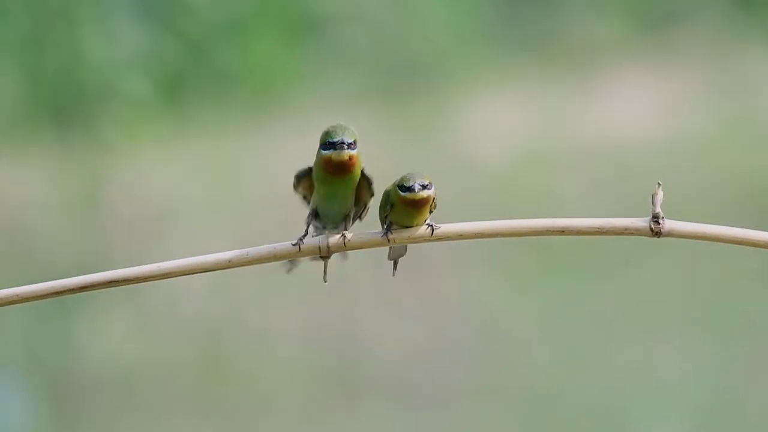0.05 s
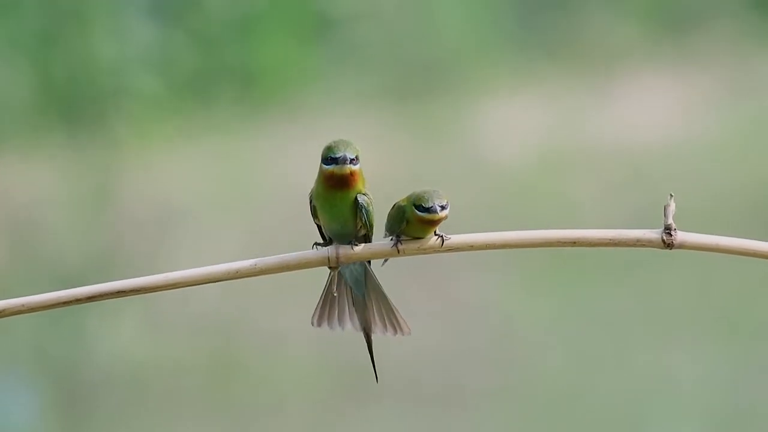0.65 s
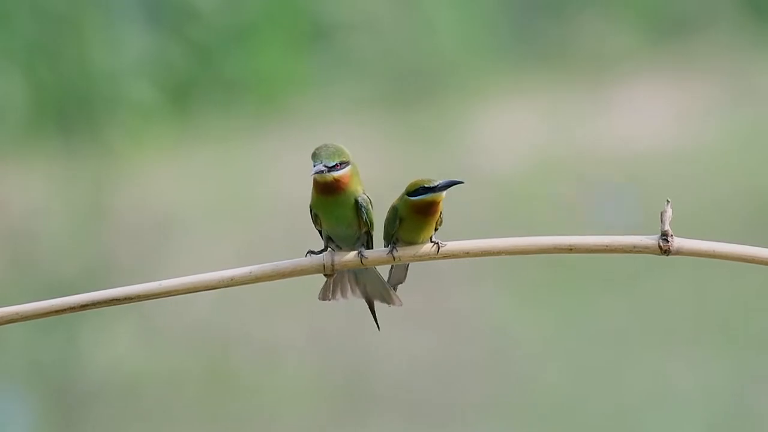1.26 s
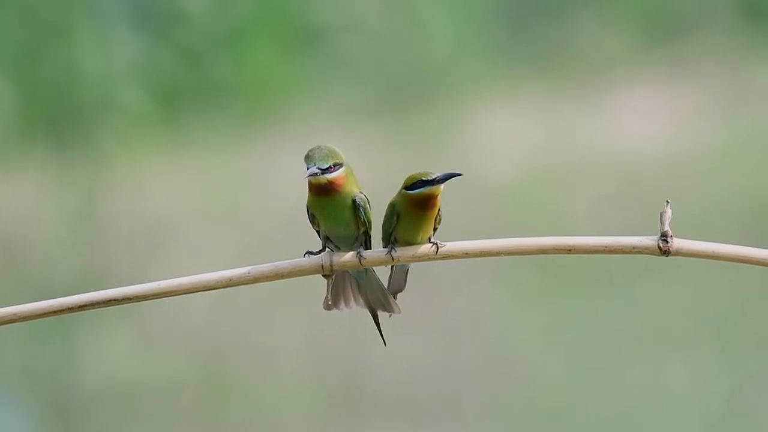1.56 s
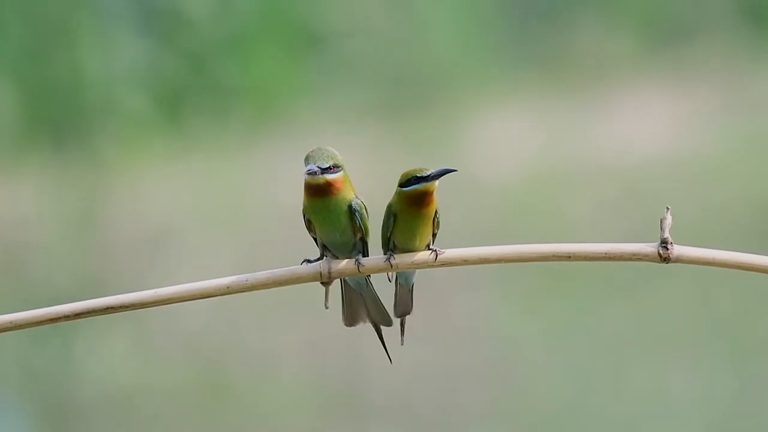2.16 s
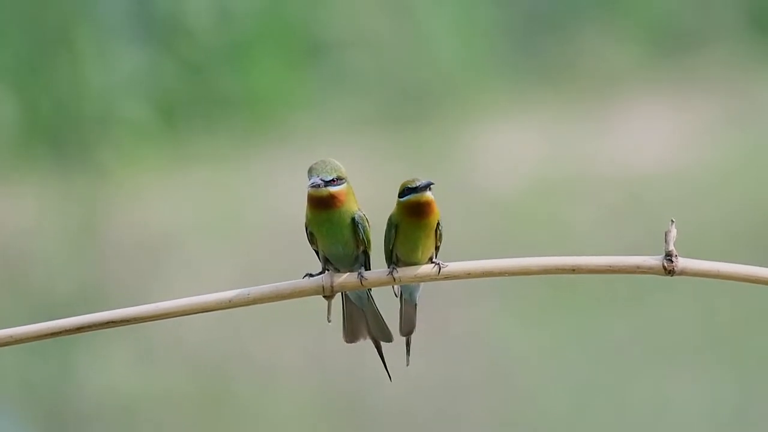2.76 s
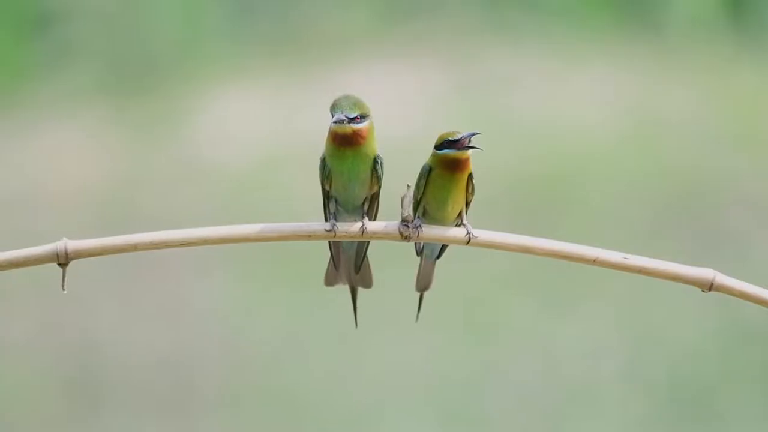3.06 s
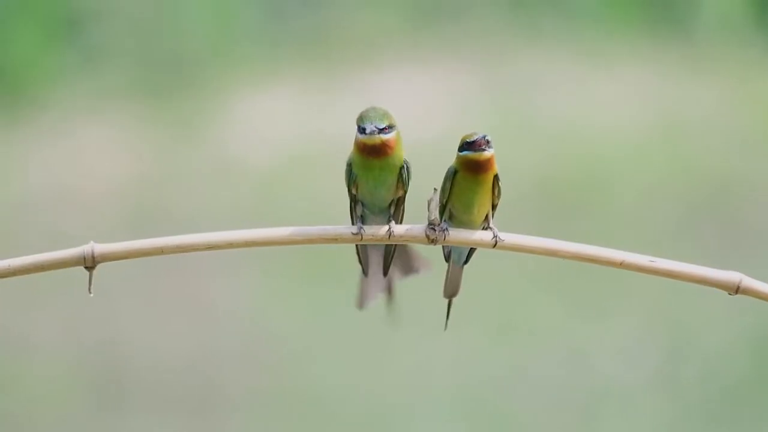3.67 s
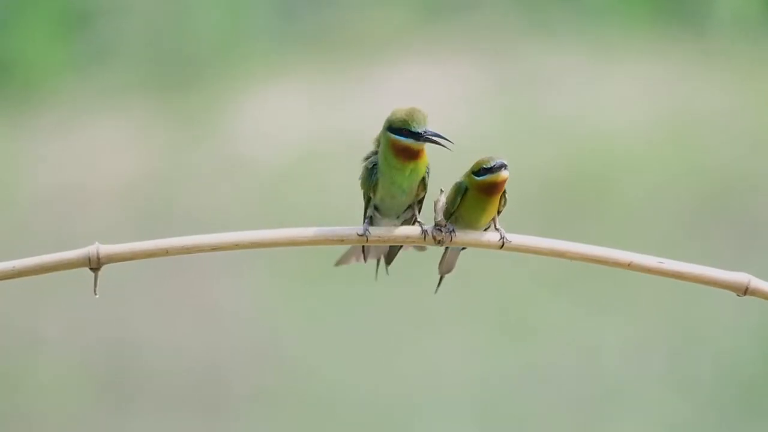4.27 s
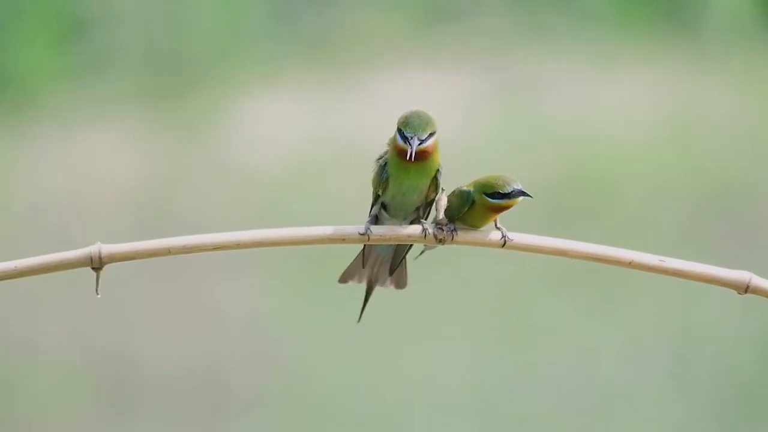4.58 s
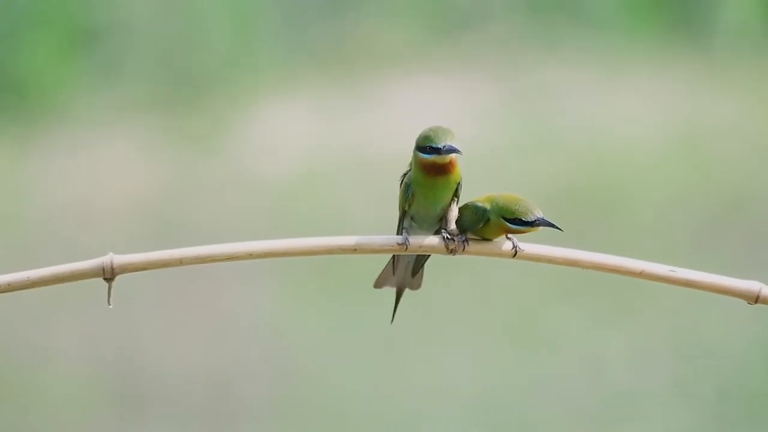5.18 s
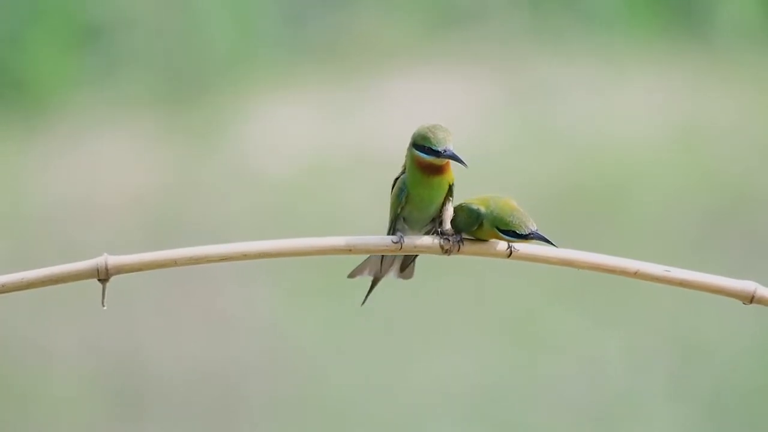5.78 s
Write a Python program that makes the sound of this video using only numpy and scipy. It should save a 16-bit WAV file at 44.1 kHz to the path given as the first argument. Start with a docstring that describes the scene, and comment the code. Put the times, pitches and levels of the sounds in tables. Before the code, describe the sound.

Birds call outdoors in a quick, uneven stream of high pips, peeps, warbled notes and short purring trills, with faint thin whistles trailing behind. Midway, wings flap close by with a stiff crackle, followed by a few sharp bill snaps. In the last part, wind thumps and rumbles on the right side of the microphone while the chirping continues. Insects hiss softly in the background.

```python
"""Bee-eaters on a bamboo perch

Two bee-eaters pip, yodel, peep and trill outdoors, each note a nearly pure tone of the syrinx.
Thin, drawn-out whistle tails follow their peeps, and their colony murmurs. Close by, stiff feathers
rustle and crack as wings flap, and a few sharp snaps sound. Insects hiss in the field, and later
wind buffets the right microphone port."""
import sys
import numpy as np
from scipy import signal
from scipy.fft import rfft, irfft, next_fast_len
from scipy.io import wavfile
from scipy.ndimage import map_coordinates

SR = 44100
rng = np.random.default_rng(int(sys.argv[2]) if len(sys.argv) > 2 else 0)


def log_audio(samples):
    """Write samples as a 16-bit WAV file to the path given in sys.argv[1]."""
    # one column per channel
    frames = np.atleast_2d(samples).T
    # limit to full scale, then quantise
    limited = np.clip(frames, -1, 1)
    pcm = np.round(limited * 32767).astype(np.int16)
    wavfile.write(sys.argv[1], SR, pcm)


N = 265923


def amp(db):
    """Decibels to gain."""
    return 10 ** (np.asarray(db) / 20)


def unit(x):
    """Scale to rms 1."""
    return x / np.sqrt(np.mean(x ** 2) + 1e-20)


def curve(rows):
    """An automation lane: one value per sample from (t/s, value) rows."""
    return np.interp(np.arange(N) / SR, *np.transpose(rows))


def wobble(rate, size):
    """A smooth random curve, rate knots a second."""
    return map_coordinates(rng.standard_normal(int(size * rate / SR) + 4), [np.arange(size) * rate / SR])


def wander(size, depth_db, rate):
    """An uneven gain, as from unsteady airflow."""
    return amp(depth_db * wobble(rate, size))


def noise(spectrum, size, channels=2):
    """Unrelated noises of rms 1, coloured by (f/Hz, level/dB) rows."""
    hz, db = np.transpose(spectrum)
    m = next_fast_len(size)
    gain = amp(np.interp(np.log(np.fft.rfftfreq(m, 1 / SR) + 1), np.log(hz), db))
    return unit(irfft(rfft(rng.standard_normal((channels, m))) * gain, m)[:, :size])


def sides(pan_db):
    """Left and right gains; a positive pan favours the left."""
    return amp([[pan_db / 2], [-pan_db / 2]])


def add(track, s, sound):
    """Mix a sound in at s seconds."""
    part = track[:, max(0, round(s * SR)):][:, :sound.shape[-1]]
    part += sound[..., :part.shape[1]]


def glide(length, start_hz, middle_hz, end_hz, jitter):
    """Phase of a slightly unsteady pitch arch, and the half sine of air pressure behind it."""
    u = np.linspace(0, 1, int(max(length, .004) * SR))
    hz = np.polyval(np.polyfit([0, .5, 1], [start_hz, middle_hz, end_hz], 2), u)
    hz = hz * (1 + jitter * wobble(372, len(u)))
    return 2 * np.pi * np.cumsum(hz) / SR, np.abs(np.sin(np.pi * u))


def outdoors(x, wet_db, t60):
    """Ground and bushes scatter a short, thin echo."""
    t = np.arange(SR // 2) / SR
    tail = rng.standard_normal((2, len(t))) * amp(-60 * t / t60) * (t > .004)
    tail /= np.linalg.norm(tail, axis=1, keepdims=True)
    return x + amp(wet_db) * signal.fftconvolve(x, tail, axes=1)[:, :N]


def spaced(x, lead):
    """A sound reaches the left port lead samples before the right."""
    return np.array([x[0], map_coordinates(x[1], [np.arange(N) - lead])])


# Colours of the open air, the distant colony and the insects: f/Hz, level/dB
AIR_COLOUR = [(15, -49), (25, -12), (113, -1), (421, -12.5), (579, -10.5), (849, -13.5), (1470, -14.5),
              (2120, -9.5), (2510, -4.5), (3380, -28), (4000, -14), (5200, -40), (8800, -120)]
COLONY_COLOUR = [(300, -16), (1200, -13.5), (1800, -9.5), (2500, -26.5), (3100, 1), (3800, -7.5),
                 (5000, -54)]
INSECT_COLOUR = [(2120, -4.5), (3600, -20.5), (4370, -0.5), (5300, 5.5), (7290, 1), (7950, 4.5), (9180, 5),
                 (10600, -5), (14600, -12), (15100, -22), (16000, -5)]
# Fader ride of the insect chorus: t/s, level/dB
INSECT_RIDE = [(0.0, -52), (0.3, -54.5), (3.11, -55.5), (3.22, -53), (4.99, -51), (6.03, -51.5)]


def field(insect_gain_db=4):
    """The ambience bed: low outdoor air, a murmur of distant birds and the hiss of insects."""
    air = amp(-56.5) * (noise(AIR_COLOUR, N) + noise(AIR_COLOUR, N, channels=1))
    colony = amp(-59.5) * wander(N, depth_db=3.5, rate=8.7) * noise(COLONY_COLOUR, N)
    chorus = amp(curve(INSECT_RIDE) + insect_gain_db) * wander(N, depth_db=0.76, rate=9.9)
    return air + colony + chorus * noise(INSECT_COLOUR, N) * sides(0.55)


# Strength of the breeze: t/s, level/dB
BREEZE_RIDE = [(3.7, -77), (3.88, -52), (4.11, -57), (4.17, -51.5), (4.47, -55.5), (4.66, -39),
               (4.86, -43.5), (5.02, -74), (5.12, -48), (5.41, -35), (5.5, -42.5), (5.7, -32), (5.85, -46),
               (6.03, -35)]
# Eddies that hit the port: t/s, peak/dB, centre/Hz
EDDY_HITS = [(4.205, -7.5, 154), (4.306, -6.5, 134), (4.412, -15, 124), (4.511, -13.5, 155),
             (4.563, -8.5, 122), (4.59, -11, 120), (4.626, -21.5, 207), (4.722, -6, 160),
             (4.815, -14.5, 174), (4.916, -16, 119), (5.045, -24, 128), (5.242, -4.5, 175),
             (5.272, -10.5, 162), (5.307, -7.5, 196), (5.385, -19, 218), (5.594, -10, 140),
             (5.665, -10, 140), (5.769, -17, 176)]
# Colour of the wind rumble: f/Hz, level/dB
RUMBLE_COLOUR = [(15, -47), (25, -24), (70, 5), (168, 2), (230, -6), (372, -19), (741, -47), (900, -46),
                 (1170, -55), (1980, -120)]


def wind(breeze_gain_db=12.5, wake_rise_s=0.014, wake_fall_s=0.019):
    """The breeze rumbles on the right port; each eddy pushes and pulls inside a swell of rumble."""
    clock = np.arange(N) / SR
    power = amp(curve([(3.5, -110), *BREEZE_RIDE]) + breeze_gain_db) ** 2
    out, t = np.zeros((2, N)), np.arange(-SR // 40, SR // 40) / SR
    for s, db, hz in EDDY_HITS:
        u = 2 * np.pi * hz * t
        pulse = -u * np.exp(-u * u / 2) - 0.31 * u * np.exp(-2 * u * u)  # round swing, steeper core
        add(out, s + t[0], amp(db) * pulse / pulse.max())
        away = (clock - s) / np.where(clock < s, wake_rise_s, wake_fall_s)
        wake_db = -18 + 0.13 * db  # stronger eddies rumble a little more
        power += amp(wake_db) ** 2 * np.exp(-2 * away ** 2)
    return (out + np.sqrt(power) * noise(RUMBLE_COLOUR, N)) * amp([[-30], [0]])


# Far-off tones, the drawn-out tails of the bee-eaters' peeps and a small bird's high calls:
# t/s, length/s, start/Hz, middle/Hz, end/Hz, level/dB
DISTANT_TONES = [(1.0, 0.29, 1390, 1322, 1405, -64), (1.52, .24, 945, 1044, 1109, -55.5),
                 (3.4, 1.75, 734, 634, 637, -60.5)]
PEEP_TAILS = [(.88, 0.19, 2100, 2080, 2200, -54), (1.825, 0.57, 1960, 1915, 2195, -50.5),
              (2.545, 0.37, 1935, 1860, 1990, -50), (3.06, .16, 1830, 1870, 2034, -51.5),
              (3.515, 0.381, 1893, 1805, 1830, -50.5), (5.28, 0.065, 2080, 2170, 2050, -51),
              (5.8, 0.33, 1900, 1710, 1730, -52.5)]
SMALL_BIRD_CALLS = [(1.322, 0.071, 7360, 7450, 6600, -46.5), (1.548, 0.013, 5450, 5920, 5900, -29.5)]


def whistles(rows, octave_db, jitter, drop=0):
    """Thin whistled tones; each starts sharp by the share drop and settles onto its arch."""
    out = np.zeros((2, N))
    for s, length, start_hz, middle_hz, end_hz, db in rows:
        phase, push = glide(length, start_hz, middle_hz, end_hz, jitter)
        t = np.arange(len(phase)) / SR
        bend_hz = 8 * wobble(18, len(t)) + drop * start_hz * np.exp(-t / .018)
        phase += 2 * np.pi * np.cumsum(bend_hz) / SR
        tone = np.sin(phase) + amp(octave_db) * np.sin(2 * phase)
        envelope = push ** 0.028 * wander(len(t), depth_db=2.8, rate=24)
        add(out, s, amp(db) * unit(tone * envelope))
    return out


# Soft feather brushes as the birds shift: t/s, length/s, level/dB, whoosh against slide/dB
FEATHER_BRUSHES = [(.005, 0.035, -59, 4.5), (4.545, .11, -55, -25), (5.031, 0.077, -53.5, -31),
                   (5.93, 0.037, -49, -22)]


def brushes(gain_db=5):
    """Feathers slide over each other and push a little air."""
    out = np.zeros((2, N))
    for s, length, db, whoosh_db in FEATHER_BRUSHES:
        size = int(length * SR)
        slide = noise([(500, -11), (2500, 5), (8000, 3), (16000, -7.5)], size)
        whoosh = noise([(100, -27), (400, 7), (700, 2), (1500, -46)], size)
        grainy_swell = unit(np.hanning(size) * wander(size, depth_db=3.5, rate=250))
        add(out, s, amp(db + gain_db) * grainy_swell * (slide + amp(whoosh_db) * whoosh))
    return out


def cracks(rows, spectrum, rise_s, t60, gain_db, puff_gain_db):
    """Short noise bursts, each with its own colour, over a dull puff of air."""
    out, t = np.zeros((2, N)), np.arange(SR // 20) / SR
    envelope = (1 - np.exp(-t / rise_s)) ** 2 * amp(-60 * t / t60)
    envelope /= envelope.max()
    for s, db, puff_db in rows:
        colour = [(hz, level + rng.normal(0, 1.8)) for hz, level in spectrum]
        crack = 0.63 * (noise(colour, len(t)) + noise(colour, len(t), channels=1))
        puff = noise([(40, -45), (150, -36), (350, 5), (900, 1.5), (2500, -20)], len(t), channels=1)
        burst = crack + amp(puff_db + puff_gain_db) * puff
        add(out, s + 0.00065, amp(db + gain_db) * envelope * burst)
    return out


# Dry snaps, as of a bill, and light bill ticks: t/s, level/dB, puff against crack/dB
BILL_SNAPS = [(3.2955, -19, -18), (3.3305, -26.5, -8), (4.2348, -29.5, 0), (5.9465, -50, -20)]
BILL_TICKS = [(.02, -44.5, 3), (.179, -52, -38), (.577, -41, -20), (1.083, -39, -37), (1.422, -32.5, -22)]
# Colour of both: f/Hz, level/dB
BILL_COLOUR = [(200, -0.5), (1000, -10.5), (2200, 3), (4000, 5), (6500, -7.5), (11000, -13), (16000, -27)]


def bills():
    """Bills click: sharp snaps to the right, softer ticks in the centre."""
    snaps = cracks(BILL_SNAPS, BILL_COLOUR, rise_s=.0003, t60=.006, gain_db=-1.5, puff_gain_db=0)
    ticks = cracks(BILL_TICKS, BILL_COLOUR, rise_s=.0009, t60=.011, gain_db=0.5, puff_gain_db=5.5)
    return snaps * sides(-8) + ticks


# Wingbeats: t/s, length/s, rustle level/dB
WING_STROKES = [(2.662, 0.039, -33.5), (2.723, 0.089, -28)]
# Feather cracks in the wingbeats: t/s, level/dB, puff against crack/dB
FEATHER_CRACKS = [(2.663, -25, -30), (2.675, -13.5, -33), (2.683, -16.5, -30), (2.705, -20, -39),
                  (2.722, -16.5, -34), (2.7355, -9, -18), (2.762, -14.5, -26.5), (2.774, -12, -42),
                  (2.7795, -11.5, -27), (2.787, -17, -26), (2.7955, -8, -38), (2.803, -24, -25)]
# Colour of stiff feathers: f/Hz, level/dB
FEATHER_COLOUR = [(120, -53), (200, -46), (340, -26), (647, -19), (986, -11), (1180, -16), (1530, -4),
                  (2910, -3), (3190, -5), (5130, -4.5), (6760, -4), (7410, -14), (9060, -7), (16000, -31.5)]


def wings(attack_db_per_s=2500, release_db_per_s=800):
    """Stiff feathers rustle through each wingbeat and crack, more brightly, against each other."""
    t, beats = np.arange(N) / SR, np.zeros(N)
    for s, length, db in WING_STROKES:
        before, after = np.maximum(s - t, 0), np.maximum(t - s - length, 0)
        beats += amp(db - attack_db_per_s * before - release_db_per_s * after)
    rustle = amp(-5.5) * beats * wander(N, depth_db=2, rate=900) * noise(FEATHER_COLOUR, N)
    bright = [(hz, db + 3 * np.clip(np.log2(hz / 4000), 0, 2)) for hz, db in FEATHER_COLOUR]
    flaps = cracks(FEATHER_CRACKS, bright, rise_s=.0005, t60=.016, gain_db=-5, puff_gain_db=7.5)
    return (rustle + flaps) * sides(-6.5)


def voice(phase, octave_db):
    """A syrinx tone with three overtones, the octave strongest among them."""
    overtones = np.sin(2 * phase) + amp(-14) * np.sin(3 * phase) + amp(-22.5) * np.sin(4 * phase)
    return np.sin(phase) + amp(octave_db) * overtones


def note(length, pitches, octave_db, rough_db, swell):
    """One slurred note through three pitches; the second side of the syrinx roughens it."""
    phase, push = glide(length, *pitches, jitter=0.0092)
    size = len(phase)
    second_side = wobble(408, size) * np.cos(phase) + amp(-7.5) * wobble(284, size) * np.sin(phase * .7)
    colour = [(1500, -10.5), (4000, 0), (5500, 5), (7200, -20), (9000, -4), (12000, -26), (16000, -21)]
    rasp = amp(-13.5) * noise(colour, size, channels=1)[0]
    tone = voice(phase, octave_db) + amp(rough_db) * (second_side + rasp)
    ripple = wander(size, depth_db=2.5, rate=260)
    ripple_by_direction = np.array([wander(size, depth_db=2, rate=190) for _ in range(2)])
    return amp(-2.5) * unit(tone * ripple * ripple_by_direction * push ** swell)


# Purring trills: t/s, length/s, top pitch/Hz, level/dB
TRILL_CUES = [(1.306, 0.042, 2546, -31.5), (1.47, 0.092, 2475, -32), (1.561, 0.078, 2375, -37),
              (1.738, 0.022, 2544, -32.5)]


def trills(flutter_hz=142, depth=0.55, sag=0.066):
    """Low, nearly flat notes in which the airflow flutters."""
    out = np.zeros((2, N))
    for s, length, hz, db in TRILL_CUES:
        end_hz = hz * (1 - sag)
        tone = note(length, (end_hz, hz, end_hz), octave_db=-29, rough_db=-16, swell=.3)
        flutter = 1 + depth * np.cos(2 * np.pi * flutter_hz * np.arange(tone.shape[1]) / SR)
        add(out, s, amp(db) * tone * unit(flutter))
    return out * sides(-3.5)


# Smooth peeps: t/s, length/s, top pitch/Hz, level/dB, pan/dB, octave/dB
PEEP_CUES = [(0.257, 0.04, 2450, -38, 6, -30), (0.56, 0.046, 3144, -31.5, 1, -16),
             (.663, 0.035, 2630, -31, -4, -22), (0.763, .039, 2400, -43, 3, -11),
             (1.646, 0.044, 2466, -36.5, 1, -27), (1.779, .058, 2815, -31.5, -7, 1),
             (2.046, 0.047, 2500, -37.5, 1.5, -16), (2.213, 0.046, 2763, -36, 6.5, -7.5),
             (2.382, 0.042, 2523, -37, -2, -25), (2.501, 0.048, 2847, -31.5, -6, -11),
             (2.555, 0.035, 2750, -31, 4, -13), (2.579, 0.046, 2680, -33, 6, -8.5),
             (2.974, 0.037, 2720, -33, 6.5, -12.5), (3.032, 0.044, 2604, -35.5, 0, -14.5),
             (3.466, .065, 2650, -34, 0.5, -18), (4.036, 0.031, 2270, -45.5, -4, -24),
             (5.03, 0.028, 2740, -47, 31.5, -12), (5.671, 0.051, 2780, -34.5, 1, -15),
             (5.762, 0.052, 2450, -32.5, 0, -26)]


def peeps(sag_per_s=3.8):
    """Clean arches of pitch; the longer the peep, the deeper its arch."""
    out = np.zeros((2, N))
    for s, length, hz, db, pan_db, octave_db in PEEP_CUES:
        end_hz = hz * (1 - sag_per_s * length)
        peep = note(length, (end_hz, hz, end_hz), octave_db, rough_db=-33, swell=0.29)
        add(out, s, amp(db) * sides(pan_db) * peep)
    return out


# Yodels, cued on the crack: t/s, climb/s, slide/s, reference pitch/Hz, level/dB, pan/dB
YODEL_CUES = [(.592, .027, 0.024, 2675, -28.5, -5.5), (.719, 0.0096, 0.019, 2900, -32, 0),
              (.756, 0.0087, 0.015, 2740, -35, 1), (.812, 0.036, 0.017, 2850, -31, -2),
              (1.018, 0.027, 0.022, 2807, -26, 4), (1.057, 0.012, 0.016, 2914, -27.5, -3.5),
              (1.111, 0.029, 0.021, 2826, -26.5, -0.5), (1.239, 0.032, 0.012, 2520, -29, -4.5),
              (1.381, 0.018, 0.023, 2854, -23.5, 1.5), (1.45, .022, 0.026, 2830, -22, 1),
              (1.713, 0.018, 0.0199, 2490, -26.5, -2.5), (1.809, 0.022, 0.015, 2629, -26, 0),
              (1.897, 0.019, 0.019, 2730, -21.5, -1), (1.937, 0.00063, 0.016, 2670, -22, 0),
              (1.989, .023, 0.024, 2723, -24.5, 4)]


def yodels(gap_s=0.00204, octave_db_per_khz=31):
    """The voice climbs, fails for an instant, cracks into a higher register and slides down."""
    out = np.zeros((2, N))
    for s, climb_s, slide_s, hz, db, pan_db in YODEL_CUES:
        octave_db = -21 + octave_db_per_khz * (hz - 2700) / 1000  # higher notes are brighter
        climb_hz, slide_hz = hz * np.array([.83, .94, .94]), hz * np.array([1.17, .99, .884])
        gain = amp(db) * sides(pan_db)
        if climb_s > .004:
            climb = note(climb_s - gap_s, climb_hz, octave_db, rough_db=-15.5, swell=0.15)
            crescendo = np.linspace(.45, 1, climb.shape[1])
            add(out, s - climb_s, gain * amp(-4) * unit(climb * crescendo))
        add(out, s, gain * note(slide_s, slide_hz, octave_db, rough_db=-12.5, swell=0.39))
    return out


# Quick rising pips, cued on the squeeze at mid-sweep: t/s, middle pitch/Hz, level/dB, pan/dB
PIP_CUES = [(0.03, 2610, -26, -3.5), (0.071, 2590, -25.5, 0.5), (.128, 2570, -25, -1.5),
            (.19, 2660, -22, -1), (0.288, 3380, -35, -4), (.341, 2710, -24, -1), (.387, 2670, -26, 0),
            (0.461, 2665, -24, -0.5), (0.843, 2676, -24.5, -1), (.886, 2750, -25.5, -0.5),
            (1.266, 2700, -22, -2), (2.412, 3240, -31.5, -1), (2.465, 3180, -41, -4), (3.067, 2900, -40, 1),
            (3.166, 2800, -31, 5), (3.328, 2850, -30.5, -2), (3.388, 2910, -28.5, -1),
            (3.421, 3000, -30.5, 10.5), (3.574, 3050, -26, 0.5), (3.612, 2690, -27.5, 1),
            (3.758, 2650, -27.5, 1.5), (3.8, 2740, -23, -6.5), (3.843, 2535, -30, -3),
            (3.876, 2590, -32, 0), (3.921, 2720, -20, -2.5), (4.118, 2696, -27, 1), (4.173, 2640, -33, 0),
            (4.304, 2610, -23.5, -2.5), (4.342, 2660, -25.5, -4.5), (4.376, 2697, -27.5, 0.5),
            (4.446, 2700, -31, 1), (4.522, 2564, -29, 1), (4.692, 2670, -26, -6.5), (4.733, 2590, -30.5, 6),
            (4.823, 2614, -27.5, 1), (5.031, 2726, -26, -4.5), (5.095, 2330, -37.5, -1),
            (5.231, 2720, -27.5, 3.5), (5.392, 2650, -30.5, -4.5), (5.523, 2810, -40, -18),
            (5.578, 2750, -34.5, -21), (5.677, 2605, -24, -2), (5.728, 2980, -27.5, 4),
            (5.874, 2760, -23.5, 6)]
# How firmly the pips are closed: t/s, level/dB
CLOSING_RIDE = [(0, -4), (.4, 5.5), (1.3, 3), (3, -2.5), (4, -2.5), (4.4, 1), (6, -3.5)]


def pips(length=.023, close_delay_s=0.0036, ceiling_hz=3700):
    """Both sides of the syrinx sweep up and beat together; a soft low note closes each pip."""
    out = np.zeros((2, N))
    rasp_colour = [(1500, -1.5), (4000, -7), (6000, -1), (9300, 7), (12000, -13), (16000, -26)]
    for s, hz, db, pan_db in PIP_CUES:
        top_hz = min(hz * 1.37, ceiling_hz)  # levels off at the top of the bird's range
        phase, push = glide(length, hz * .82, hz, top_hz, jitter=0.027)
        t = np.arange(len(phase)) / SR - length / 2
        # the beat peaks near the squeeze and differs with direction
        offset = rng.normal(0, 0.082) + 0.22 * rng.standard_normal((2, 1))
        beat = 2 * np.pi * (rng.uniform(170, 322) * t + offset)
        sweep = voice(phase, octave_db=-26.5) + amp(-4.5) * np.sin(phase + beat)
        rasp = amp(-25) * noise(rasp_colour, len(t))
        swell = 0.6 * push + push ** 4  # soft lead-in, sharp squeeze
        gain = amp(db) * sides(pan_db)
        add(out, s - length / 2, gain * amp(-4) * unit((sweep + rasp) * swell))
        closing = gain * amp(np.interp(s, *np.transpose(CLOSING_RIDE)))
        phase, push = glide(0.018, 1742, 1759, 1690, jitter=0.041)  # the low closing note
        add(out, s + close_delay_s, closing * amp(-20.5) * unit(np.sin(phase) * push))
        # the upper side lingers
        phase, push = glide(0.022, top_hz * .85, top_hz * .9, top_hz * .855, jitter=0.019)
        add(out, s + close_delay_s, closing * amp(-21.5) * unit(np.sin(phase) * push))
    return out


# How much sooner the left port hears the birds: t/s, lead/samples
LEFT_LEAD = [(0, 1.5), (1.3, 3.5), (3.1, 5.5), (6.03, 7)]


def scene():
    """The mix: field, wind, far-off tones, wet whistles, nearly dry movement and the main calls."""
    lead = curve(LEFT_LEAD)
    calls = outdoors(spaced(pips() + yodels() + peeps() + trills(), lead), wet_db=-11.5, t60=.2)
    tails = whistles(PEEP_TAILS, octave_db=-8, jitter=.002, drop=.17)
    high = whistles(SMALL_BIRD_CALLS, octave_db=-42, jitter=0.01)
    whistled = outdoors(spaced(tails + high, lead), wet_db=-3, t60=0.13)
    wavering = whistles(DISTANT_TONES, octave_db=-6, jitter=0.0729)
    far = amp(-3) * outdoors(wavering, wet_db=-2.5, t60=0.96)
    movement = spaced(bills(), lead) + spaced(wings(), lead=-8) + brushes()
    close = outdoors(movement, wet_db=-22, t60=.12)
    return field() + wind() + far + whistled + close + calls


def record(dry, low_cut_hz=42, top_hz=15950):
    """The microphone sheds the deepest bass, and nothing passes above the band limit."""
    m = next_fast_len(N + 8192)
    thinned = signal.sosfilt(signal.butter(2, low_cut_hz, "highpass", fs=SR, output="sos"), dry)
    return irfft(rfft(thinned, m) * (np.fft.rfftfreq(m, 1 / SR) < top_hz), m)[:, :N]


dry = scene()
out = record(dry)
log_audio(out)
```